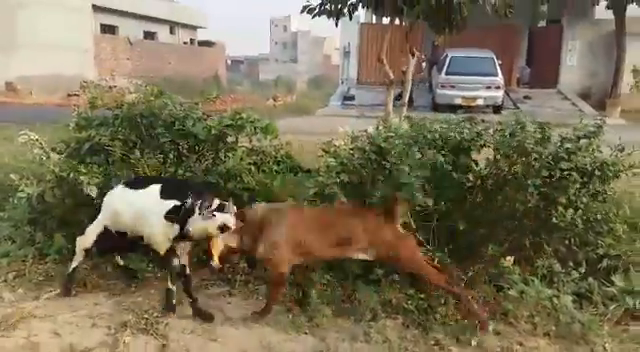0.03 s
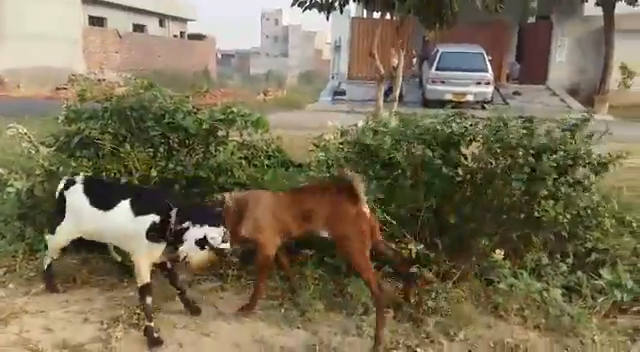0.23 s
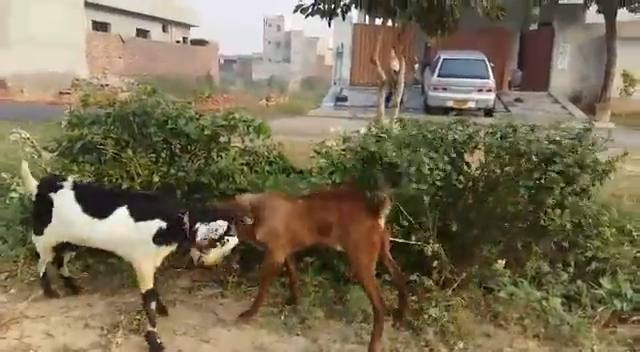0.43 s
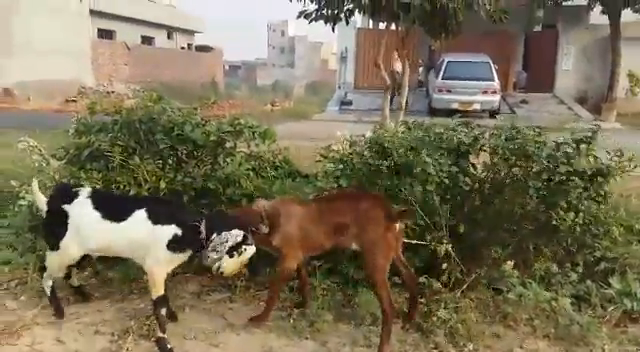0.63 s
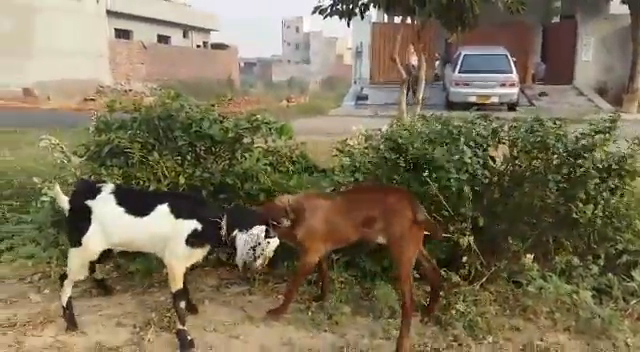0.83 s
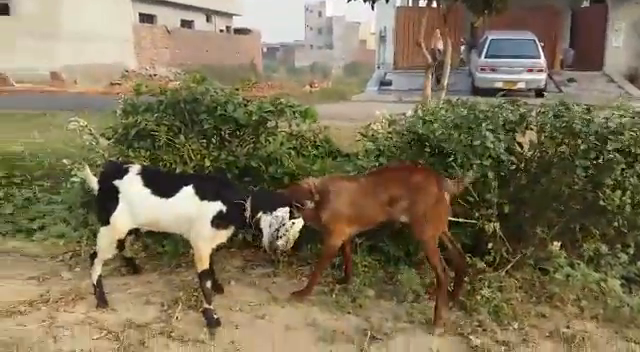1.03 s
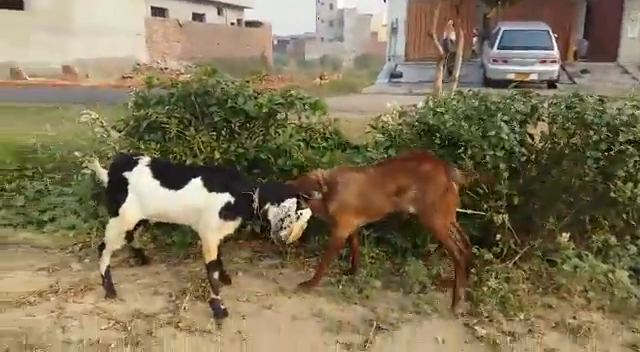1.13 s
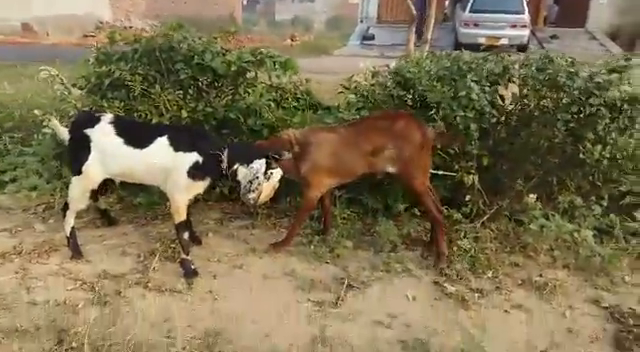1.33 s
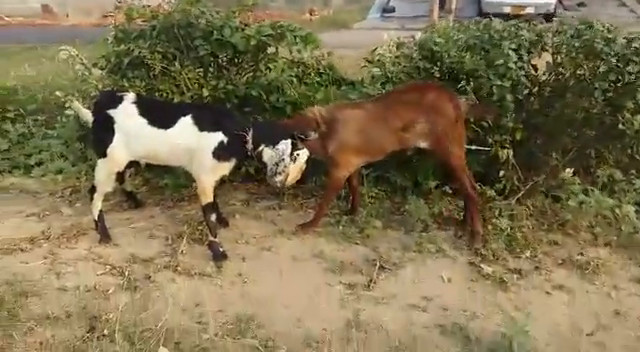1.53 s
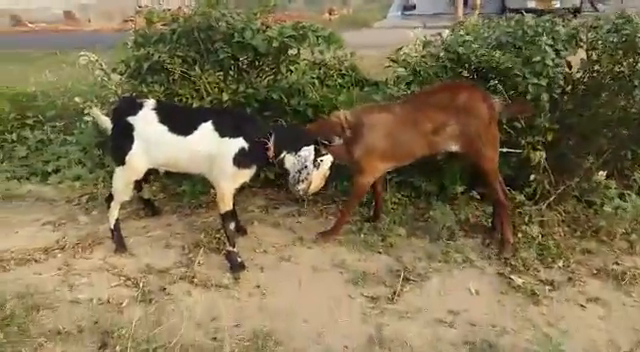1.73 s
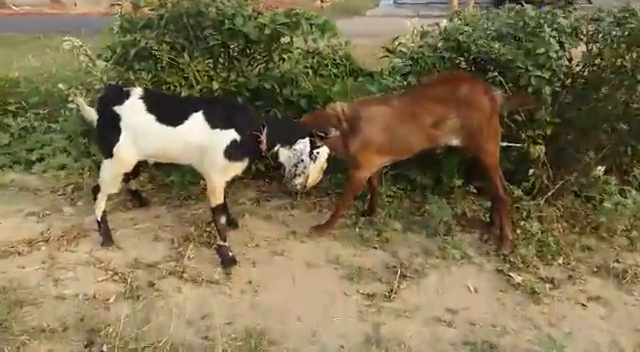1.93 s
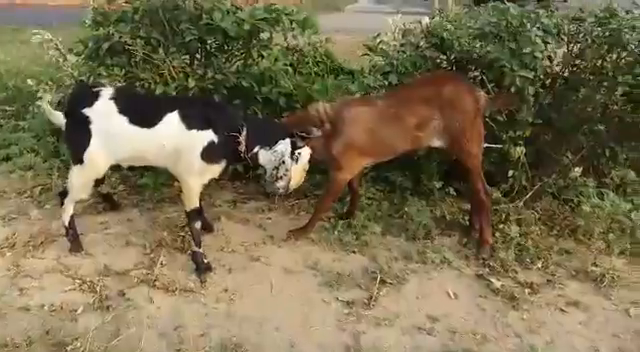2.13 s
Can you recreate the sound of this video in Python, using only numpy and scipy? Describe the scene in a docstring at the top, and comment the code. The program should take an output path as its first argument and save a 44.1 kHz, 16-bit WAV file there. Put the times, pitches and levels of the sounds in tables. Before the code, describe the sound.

Two goats clash horns with one sharp crack, then scuffle through dry leaves outdoors.

```python
"""Dry leaves rustle and two goats clash heads, a quick run of contacts ringing horns and skulls.
They land on their hooves and shove each other on a dirt verge beside a hedge; twigs snap, stalks crunch.
A dull tap sounds on the left, then the locked horns grate once in a stream of tiny slips.
Small birds call some way off, over traffic rumble, a distant engine's hum and a light breeze."""
import sys
import numpy as np
from scipy import signal
from scipy.fft import rfft, irfft
from scipy.io import wavfile

SR = 44100
rng = np.random.default_rng(int(sys.argv[2]) if len(sys.argv) > 2 else 0)


def inscribe(sig):
    """Save sig as 16-bit PCM at rate SR to the path in sys.argv[1].

    A 1-D sig is mono; a 2-D sig holds one channel per row.
    Samples are clipped to [-1, 1] before scaling.
    """
    pcm = np.round(np.clip(np.atleast_2d(sig).T, -1, 1) * 32767)
    wavfile.write(sys.argv[1], SR, pcm.astype(np.int16))


N = 97020
T = np.arange(N) / SR
BIN_HZ = np.arange(N // 2 + 1) * SR / N

# Legs moving through the leaves and grit. Each row: time in seconds, level in dB.
LEG_MOTION = [(0, -49.5), (.06, -44), (.095, -46.5), (.115, -36.5), (.15, -40.5), (.165, -31.5), (.19, -40),
              (.225, -39), (.24, -43), (.264, -39.5), (.273, -35), (.285, -45.5), (.32, -48), (.375, -51),
              (.405, -44), (.44, -54), (.62, -53.5), (.78, -62.5), (.91, -52), (.97, -55.5), (1.12, -57),
              (1.18, -48.5), (1.33, -75), (1.88, -57.5), (1.97, -48.5), (2.08, -55), (2.17, -53),
              (2.2, -65)]


def from_db(db):
    """Decibels to gain."""
    return 10 ** (np.asarray(db) / 20)


def unit_rms(x):
    """Scale to unit rms."""
    return x / np.sqrt(np.mean(x ** 2) + 1e-20)


def envelope(curve):
    """Gain along a (seconds, dB) curve."""
    return from_db(np.interp(T, *np.transpose(curve)))


def per_bin(points):
    """A (Hz, value) table interpolated over log frequency at every FFT bin."""
    hz, value = np.transpose(points)
    return np.interp(np.log(BIN_HZ + 1e-3), np.log(hz), value)


def colour(x, spectrum):
    """Filter by a (Hz, dB) table, keeping the power of white noise."""
    return irfft(rfft(x) * unit_rms(from_db(per_bin(spectrum))), N)


def pan(left_minus_right_db):
    """Left and right gains."""
    return from_db(np.array([[left_minus_right_db], [-left_minus_right_db]]) / 2)


def drift(rate_hz):
    """Random wander of unit rms, mostly below rate_hz."""
    return unit_rms(irfft(rfft(rng.standard_normal(N)) / (1 + (BIN_HZ / rate_hz) ** 2), N))


def correlate(two, coherence):
    """Mix two independent signals into a partly coherent stereo pair."""
    mid, side = rfft(two)
    left_right = np.sqrt(1 + coherence) * mid + np.sqrt(1 - coherence) * side * [[1], [-1]]
    return irfft(left_right / np.sqrt(2), N)


def noise(coherence):
    """White stereo noise."""
    return correlate(rng.standard_normal((2, N)), coherence)


def grains(per_s, spread_db):
    """Two independent streams of random clicks, mostly small."""
    sizes = from_db(spread_db * np.minimum(rng.exponential(1, (2, N)), 4))
    signs = rng.choice([-1, 1], (2, N))
    return unit_rms(sizes * signs * (rng.random((2, N)) < per_s / SR))


def decay(start_s, t60_s):
    """Sudden onset, exponential fall."""
    return (T >= start_s) * from_db(-60 * np.clip((T - start_s) / t60_s, 0, 4))


def click(start_s):
    """Unit impulse."""
    return 1. * (np.arange(N) == int(start_s * SR))


def ring(x, hz, t60_s):
    """Resonator: a unit impulse starts a decaying sine of height 1."""
    radius = np.exp(-np.log(1000) / (t60_s * SR))
    angle = 2 * np.pi * hz / SR
    return signal.lfilter([0, np.sin(angle)], [1, -2 * radius * np.cos(angle), radius ** 2], x + 1e-18)


def lowpass(x, hz):
    """Second-order low-pass."""
    return signal.sosfilt(signal.butter(2, min(hz, SR / 3), fs=SR, output="sos"), x + 1e-18)


def delay_right(x, lag_s):
    """Delay the right channel; a negative lag advances it."""
    return np.array([x[0], np.interp(T - lag_s, T, x[1])])


def knock(start_s, db, hz, t60_s, tick_db, bright_hz):
    """A damped ring and a dull tick, both softened by the contact."""
    body = lowpass(ring(click(start_s), hz, t60_s), bright_hz)
    tick = np.gradient(ring(click(start_s), hz=1200, t60_s=0.0018))
    tick = lowpass(lowpass(tick, bright_hz), 2 * bright_hz)
    return from_db(db) * (body + from_db(tick_db) * tick / np.abs(tick).max())


def background():
    """Traffic rumble, open air and a distant engine's wavering hum."""
    # Noise spectra. Each row: frequency in Hz, gain in dB.
    traffic_spectrum = [(20, -60), (32, -34), (42, -36), (52, -2.5), (75, -0.5), (110, -0.5), (170, -4),
                        (220, -8.5), (320, -24), (500, -18), (1500, -92)]
    air_spectrum = [(100, 2.5), (300, 2), (480, 2.5), (750, 1), (1100, -8.5), (1900, -5), (2500, -8),
                    (3500, -4.5), (4800, -20.5), (7000, -27), (10000, -30), (15500, -33)]
    # Each row: frequency in Hz, left-right coherence from 0 to 1.
    air_coherence = [(100, 1), (1200, 0.44), (2500, 0.043), (4500, 0.028), (15000, 0.045)]
    # Each row: frequency in Hz, level in dB.
    engine_partials = [(75, -60), (150.2, -50.5)]
    traffic = from_db(-46 - 0.34 * drift(rate_hz=19)) * colour(noise(coherence=0.99), traffic_spectrum)
    air = from_db(-51 + 0.83 * drift(rate_hz=5.3)) * colour(noise(per_bin(air_coherence)), air_spectrum)
    hum = np.zeros(N)
    for hz, db in engine_partials:
        wander_rad = 0.43 * drift(rate_hz=1.6)
        hum += from_db(db) * np.sqrt(2) * np.sin(2 * np.pi * hz * T + wander_rad)
    return pan(-0.5) * (traffic + hum) + pan(1.24) * air


def breeze():
    """Low gusts buffet each microphone port independently."""
    # Each row: time in seconds, level in dB.
    gusts = [(0, -58), (.13, -57), (.25, -65), (.39, -50), (.52, -67), (.9, -65), (1.25, -53), (1.33, -43),
             (1.48, -58.5), (1.61, -41.5), (1.72, -62), (1.85, -53), (1.98, -67), (2.2, -46)]
    # Each row: frequency in Hz, gain in dB.
    spectrum = [(25, -31), (40, 6), (55, -0.5), (80, -5.5), (130, -3), (250, -21.5), (800, -67)]
    return pan(5) * envelope(gusts) * colour(rng.standard_normal((2, N)), spectrum)


def leaves():
    """Legs brush through leaves, setting off dense crackle."""
    # Each row: frequency in Hz, gain in dB.
    spectrum = [(200, -3), (500, -7), (1000, -3), (1700, -6.5), (2500, -8), (3300, 0.5), (3900, -0.5),
                (4900, -17.5), (6600, -18), (9000, -22), (12000, -32), (16000, -35)]
    crackle = correlate(grains(per_s=5000, spread_db=3.5), coherence=0.32)
    return colour(crackle * envelope(LEG_MOTION), spectrum)


def grit():
    """Sparse grains tick softly under the hooves."""
    # Each row: frequency in Hz, gain in dB.
    spectrum = [(2500, -9), (7000, 2.5), (10000, -8), (15000, -11)]
    return from_db(-17.5) * envelope(LEG_MOTION) * colour(grains(per_s=190, spread_db=4.3), spectrum)


def hedge_hiss():
    """A fine, high hiss comes and goes in the hedge."""
    # Each row: time in seconds, level in dB.
    swells = [(0, -68), (.27, -52), (.34, -62), (.41, -57), (.55, -66.5), (.69, -64.5), (.82, -85),
              (.92, -61), (1.08, -73), (1.3, -58), (1.42, -70.5), (1.62, -56), (1.73, -64), (1.83, -66.5),
              (1.9, -69), (2.0, -65), (2.07, -63), (2.14, -54), (2.2, -58.5)]
    # Each row: frequency in Hz, gain in dB.
    spectrum = [(2500, -18), (4200, 4.5), (5400, 4), (7000, -5), (10000, -18), (16000, -16)]
    return envelope(swells) * colour(grains(per_s=9700, spread_db=3.3), spectrum)


def hooves():
    """Hooves knock on packed earth; body weight adds low thumps."""
    # Each row: start in seconds, level in dB, pitch in Hz, t60 in seconds, tick in dB, brightness in Hz.
    strikes = [(0.0614, -36, 493, 0.013, 4, 2000), (0.147, -18.5, 565, 0.022, -2.5, 1070),
               (0.158, -25.5, 283, 0.031, -1, 1990), (0.1613, -28, 483, 0.029, -9, 1980),
               (0.2406, -25.5, 525, 0.021, -5.5, 1400), (0.2567, -35, 380, 0.024, -8, 1200),
               (0.2715, -43, 413, 0.022, 10, 6500), (.404, -41.5, 345, 0.039, 3, 6000),
               (.555, -40, 450, .03, -7, 2000)]
    # Each row: start in seconds, level in dB, pitch in Hz, length in seconds.
    thumps = [(0.113, -30, 78.8, 0.06), (.150, -31.5, 192.5, 0.024), (.157, -34.5, 166, 0.02),
              (.172, -30, 114.4, 0.026), (.555, -36, 176.5, 0.035), (1.172, -27.5, 131, 0.022),
              (1.585, -37, 103, 0.047)]
    out = sum(knock(*strike) for strike in strikes)
    for start_s, db, hz, length_s in thumps:
        age_s = T - start_s
        swell = np.sin(np.pi * np.clip(age_s / length_s, 0, 1)) ** 2
        out += from_db(db) * swell * np.sin(2 * np.pi * hz * age_s)
    return out


def head_clash():
    """Contacts ring the horns and skulls; a crack leads and the hedge scatters a short tail."""
    # Each row: start in seconds, level in dB, brightness in Hz.
    contacts = [(.1001, -11.5, 6000), (.1015, -31, 8000), (.1038, -23, 1700), (.1053, -31, 5000),
                (.1078, -18.5, 2520), (0.1461, -23.5, 1100)]
    # Each row: frequency in Hz, level in dB, t60 in seconds.
    horn_modes = [(447, -15, 0.024), (630, -14.5, 0.035), (818, -6, 0.039), (1100, -6, 0.049),
                  (1233, -6.5, 0.038), (1380, -16, 0.029), (1740, -5, 0.029), (2170, -10, 0.047),
                  (2500, -5.5, 0.019), (2830, -1.5, 0.013), (2950, -17, 0.015), (3400, -27, 0.038),
                  (3650, -12, 0.03), (3970, -13, 0.023), (4335, -15, 0.028), (6000, -18.5, 0.034),
                  (8500, -11.5, 0.0094), (10200, -30, 0.011)]
    # Each row: frequency in Hz, gain in dB.
    crack_spectrum = [(300, -21), (900, 2), (2800, 4), (4300, -0.5), (5300, -17), (8200, -14), (10000, -47),
                      (16000, -47)]
    blows = sum(from_db(db) * lowpass(click(start_s), hz) for start_s, db, hz in contacts)
    blows = lowpass(blows, 13000)
    horns = sum((-1) ** k * from_db(db) * ring(blows, hz, t60_s)
                for k, (hz, db, t60_s) in enumerate(horn_modes))
    onset_s = contacts[0][0]
    crack = from_db(-23) * decay(onset_s, t60_s=0.049) * colour(noise(coherence=0.3), crack_spectrum)
    tail = from_db(-33) * decay(onset_s, t60_s=0.24) * colour(noise(coherence=0.17), crack_spectrum)
    return delay_right(horns + crack, lag_s=80e-6) + tail


def twigs():
    """Dry twigs snap: each a short burst of fibre noise through one resonance."""
    # Each row: start in seconds, level in dB, pitch in Hz.
    snaps = [(0.1627, -23.5, 3910), (0.165, -30, 3460), (.183, -29.5, 3770), (.203, -26.5, 3720),
             (0.222, -30, 3260), (0.2497, -30.5, 4030), (0.2714, -28, 3710), (.31, -37.5, 3500),
             (0.402, -37, 3620), (1.0814, -35.5, 3700), (1.0903, -29.5, 3470), (1.1168, -26.5, 3750),
             (1.126, -37, 3160), (1.1457, -29.5, 3340), (1.1758, -29.5, 3660), (1.1836, -27, 3800)]
    bandwidth_hz, top_hz = 240, 4800
    ring_t60_s = np.log(1000) / (np.pi * bandwidth_hz)
    fibres = noise(coherence=0.33)
    out = np.zeros((2, N))
    for start_s, db, hz in snaps:
        snap = ring(fibres * decay(start_s, t60_s=0.0098), hz, ring_t60_s)
        snap = lowpass(lowpass(snap, top_hz), top_hz)
        out += from_db(db) * snap / np.abs(snap).max()
    return out


def birds():
    """Short gliding whistles; fast pitch jitter makes some raspy."""
    # Each row: start and length in seconds, level in dB, start, middle and end pitch in Hz, roughness 0-1.
    notes = [(0.517, 0.035, -55.5, 2500, 2150, 2200, 0.26), (0.54, 0.027, -50.5, 2700, 2850, 2900, 0.4),
             (0.789, .035, -63.5, 4900, 4800, 4570, 0.4), (0.995, 0.028, -47, 3400, 3386, 3320, 0.15),
             (1.026, 0.041, -54.5, 3300, 3400, 3200, 0.14), (1.571, 0.027, -58.5, 4900, 4680, 4670, 0.3),
             (1.768, .06, -69.5, 4850, 4830, 4830, 0.03), (1.832, 0.02, -51.5, 2350, 2230, 2370, 0.36),
             (1.833, .045, -67, 4950, 5080, 4900, 0.19), (1.855, 0.023, -44.5, 2450, 2775, 2950, .46),
             (1.972, 0.0234, -52, 3100, 3650, 4000, 0.11), (1.975, 0.05, -61, 4500, 4730, 4440, 0.34),
             (2.005, 0.041, -52.5, 4000, 3650, 3460, 0.02), (2.006, 0.086, -59, 2480, 2426, 2400, 0.11),
             (2.163, 0.04, -53, 3450, 3560, 3180, 0.23)]
    full_rasp_hz, fade_s = 677, 0.0045
    out = np.zeros(N)
    for start_s, length_s, db, start_hz, middle_hz, end_hz, roughness in notes:
        progress = np.clip((T - start_s) / length_s, 0, 1)
        glide = np.polyfit([0, .5, 1], [start_hz, middle_hz, end_hz], 2)
        hz = np.polyval(glide, progress) + roughness * full_rasp_hz * drift(rate_hz=475)
        swell = np.clip(np.minimum(progress, 1 - progress) * length_s / fade_s, 0, 1)
        out += from_db(db) * np.sqrt(2) * swell * np.sin(2 * np.pi * np.cumsum(hz) / SR)
    return pan(2.0) * out


def stalks():
    """A hoof grinds dry stalks into the dirt."""
    # Each row: time in seconds, level in dB.
    grinding = [(.96, -75), (1.0, -48.5), (1.035, -51), (1.065, -58), (1.105, -50.5), (1.12, -43.5),
                (1.16, -48), (1.18, -39), (1.2, -58), (1.28, -57), (1.32, -90), (1.88, -84), (1.92, -65),
                (2.0, -57), (2.06, -71)]
    # Each row: frequency in Hz, gain in dB.
    spectrum = [(200, -22), (700, -3), (1300, -6.5), (2500, -16), (2850, 1.5), (3700, 0.5), (4400, -4),
                (5200, -34), (16000, -42)]
    crunch = correlate(grains(per_s=2000, spread_db=4.7), coherence=0.32)
    return colour(crunch * envelope(grinding), spectrum)


def tap():
    """A dull knock close on the left, with a low ring that reaches both sides."""
    # Level in dB, pitch in Hz, t60 in seconds.
    low_mode = (-40, 240, 0.01)
    db, hz, t60_s = low_mode
    start_s = 1.3918
    near = pan(15.5) * knock(start_s, db=-23.5, hz=395, t60_s=0.008, tick_db=-1.5, bright_hz=2200)
    return delay_right(near, lag_s=0.0006) + from_db(db) * ring(click(start_s), hz, t60_s)


def grating_horns():
    """Horn rubs on horn in dense tiny slips; a few bigger jerks ring at their own pitch."""
    # Each row: time in seconds, level in dB.
    rubbing = [(1.42, -76), (1.47, -55), (1.507, -45.5), (1.522, -50.5), (1.535, -40), (1.55, -54),
               (1.57, -45), (1.61, -50), (1.665, -48.5), (1.69, -54), (1.73, -61), (1.80, -57.5),
               (1.85, -88)]
    # Each row: frequency in Hz, gain in dB.
    spectrum = [(300, -16), (1100, -3.5), (1450, 1.5), (2100, 3), (2900, -0.5), (3800, -23), (6000, -23),
                (10000, -40), (16000, -42)]
    # Each row: start in seconds, level in dB, pitch in Hz.
    big_slips = [(1.5378, -22, 1740), (1.5394, -31, 2000), (1.5411, -23, 2180), (1.5627, -29.5, 2130),
                 (1.5634, -33, 2700), (1.624, -38, 1900), (1.6637, -36, 1850), (1.6832, -30.5, 2380)]
    tiny_slips = correlate(grains(per_s=2200, spread_db=1.7), coherence=0.63)
    rub = colour(envelope(rubbing) * tiny_slips, spectrum)
    jerks = sum(from_db(db) * ring(click(start_s), hz, t60_s=0.0074) for start_s, db, hz in big_slips)
    jerk_band = signal.butter(2, [1100, 3400], "band", fs=SR, output="sos")
    return pan(1.7) * (rub + signal.sosfilt(jerk_band, jerks))


def scene():
    """Goats, hedge, birds, street and breeze in stereo."""
    clash = head_clash()
    undergrowth = delay_right(leaves() + stalks() + twigs(), lag_s=-40e-6) + hedge_hiss()
    fight = clash + hooves() + undergrowth + grating_horns()
    return fight + breeze() + grit() + birds() + background() + tap()


def record(dry):
    """Each microphone port has its own colour; deep bass and top treble are cut."""
    # Each row: frequency in Hz, left minus right in dB.
    port_balance = [(60, 2.5), (1300, 0.5), (2100, 1), (2550, -5), (3300, -5), (3900, -.5), (5000, 7),
                    (7500, 3.5), (10000, -1), (15000, -1)]
    low_cut_hz, high_cut_hz = 47.6, 15900
    bass_cut = 1 / np.sqrt(1 + (low_cut_hz / (BIN_HZ + 1)) ** 12)
    port_gains = from_db(per_bin(port_balance) * np.array([[1], [-1]]) / 2)
    ports = irfft(rfft(dry) * bass_cut * port_gains, N)
    return signal.sosfilt(signal.ellip(10, .1, 70, high_cut_hz, fs=SR, output="sos"), ports)


dry = scene()
out = record(dry)
inscribe(out)
```